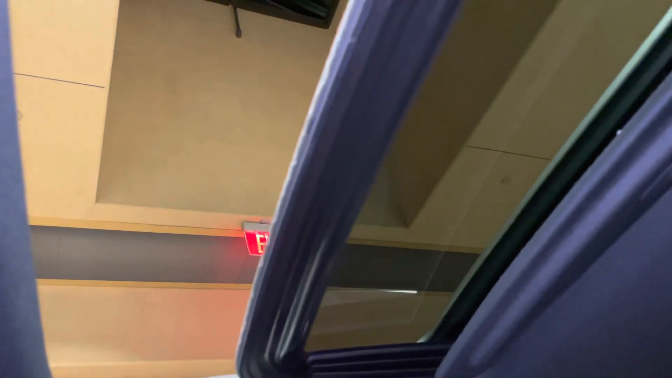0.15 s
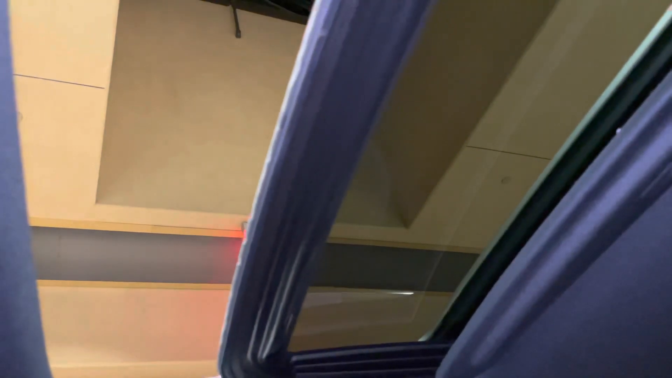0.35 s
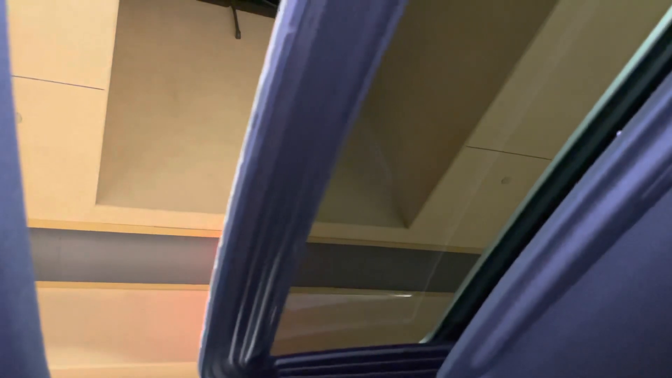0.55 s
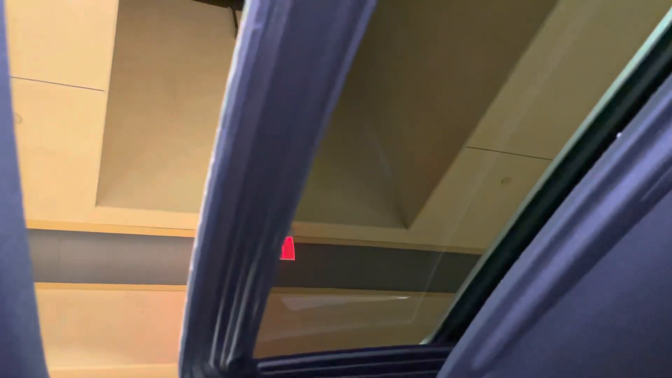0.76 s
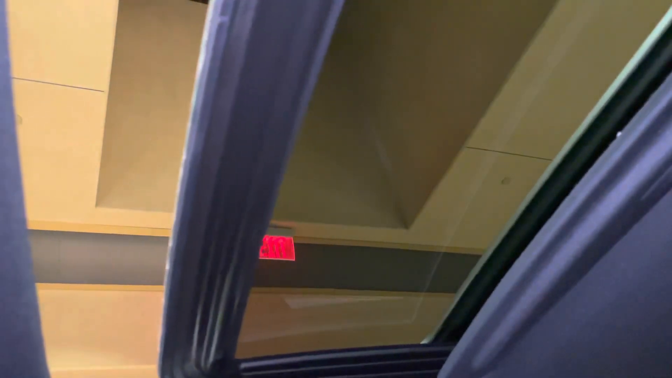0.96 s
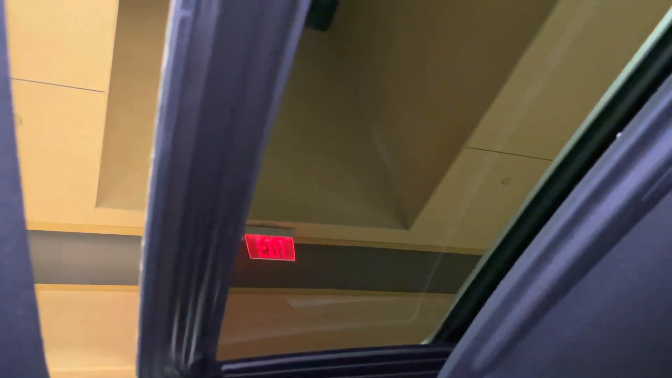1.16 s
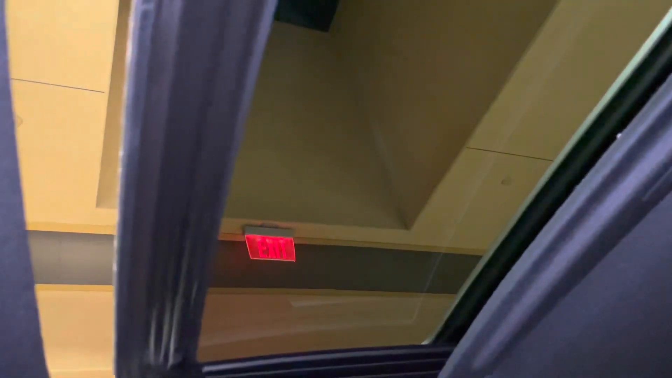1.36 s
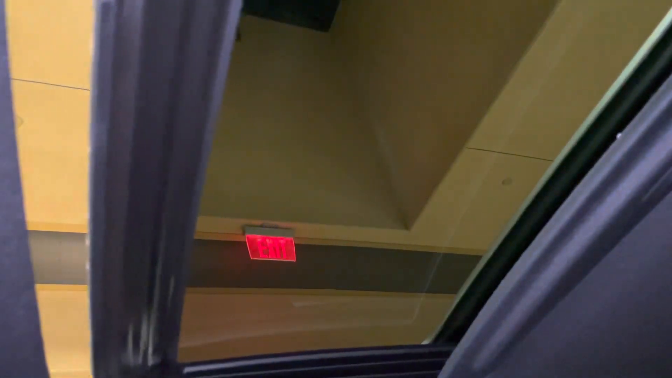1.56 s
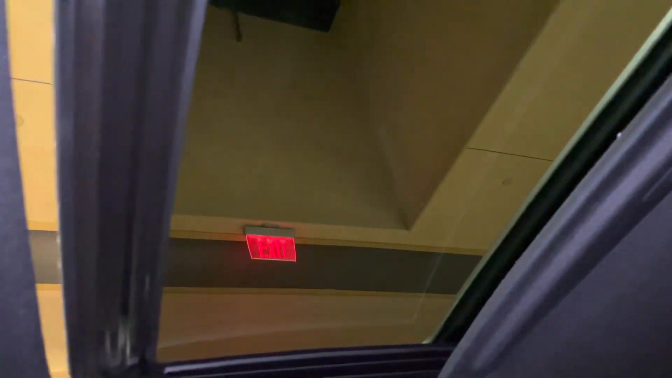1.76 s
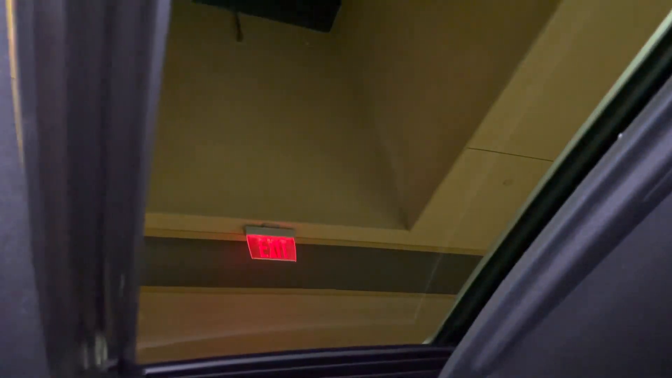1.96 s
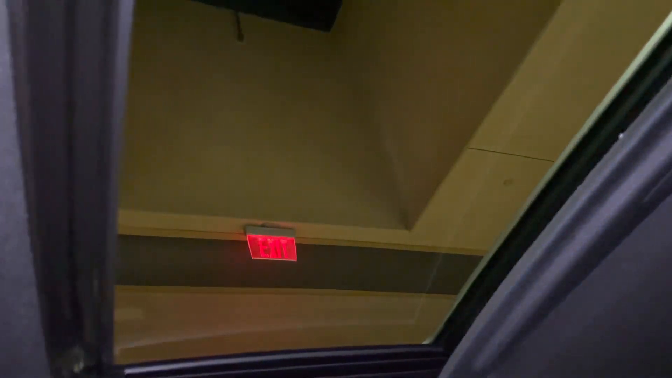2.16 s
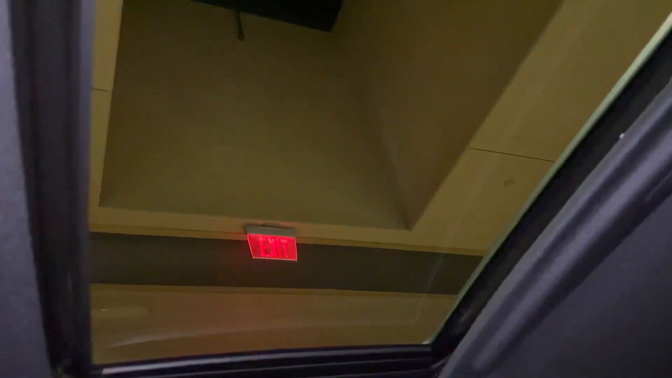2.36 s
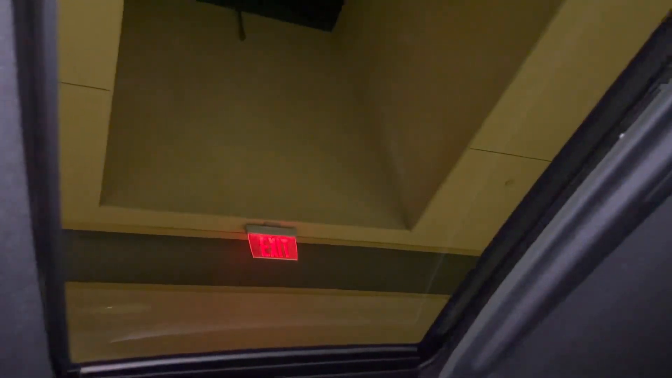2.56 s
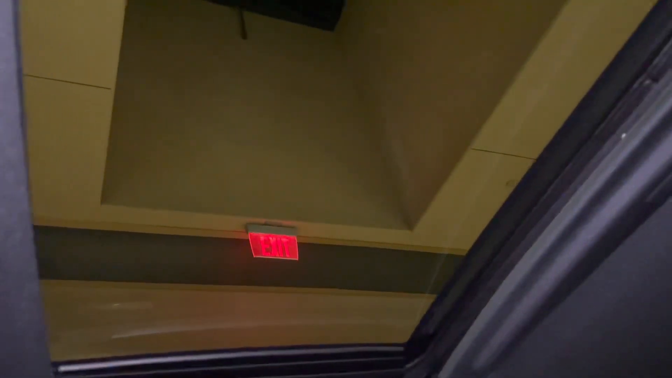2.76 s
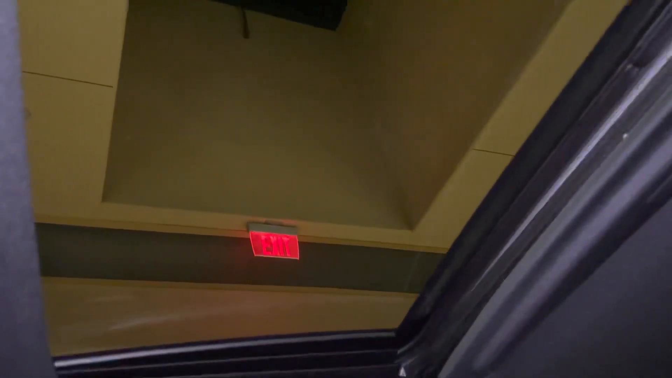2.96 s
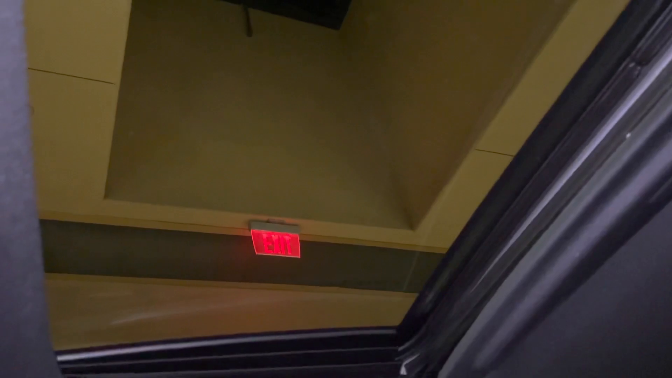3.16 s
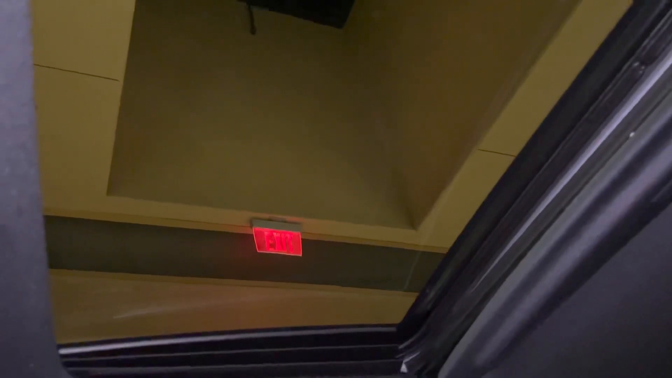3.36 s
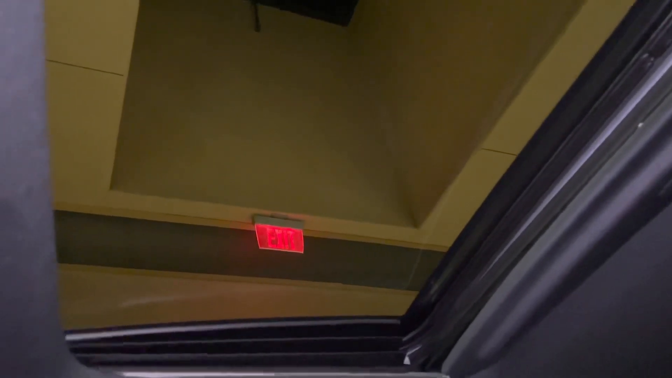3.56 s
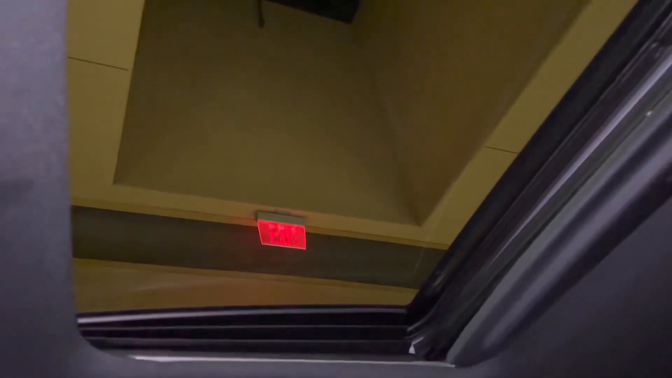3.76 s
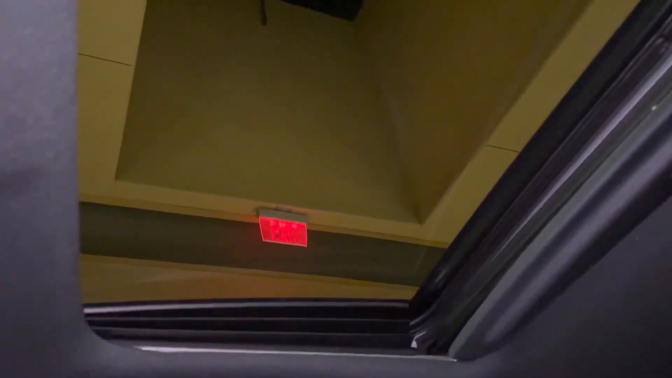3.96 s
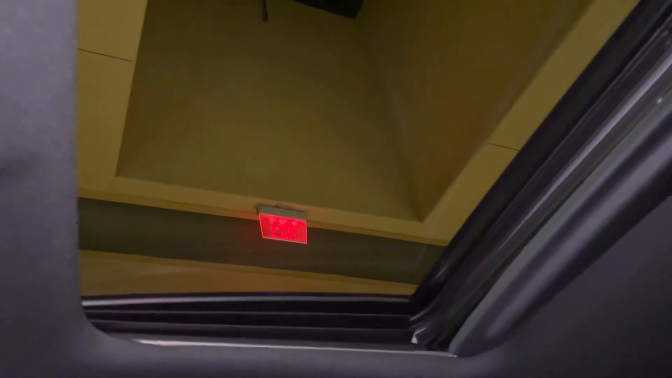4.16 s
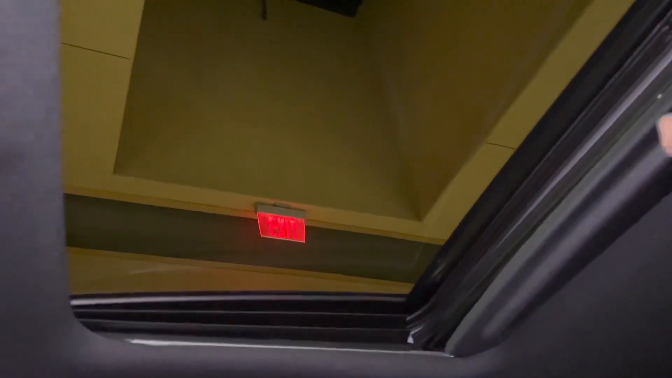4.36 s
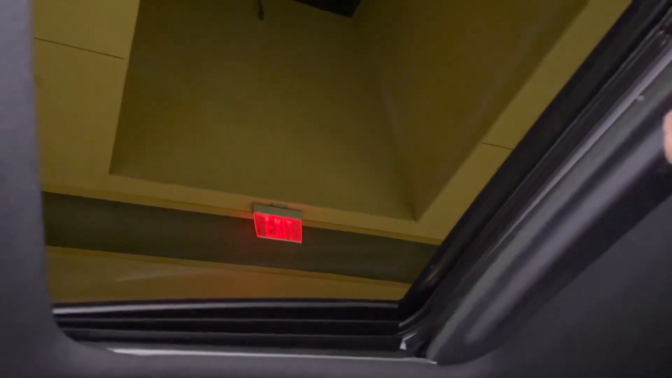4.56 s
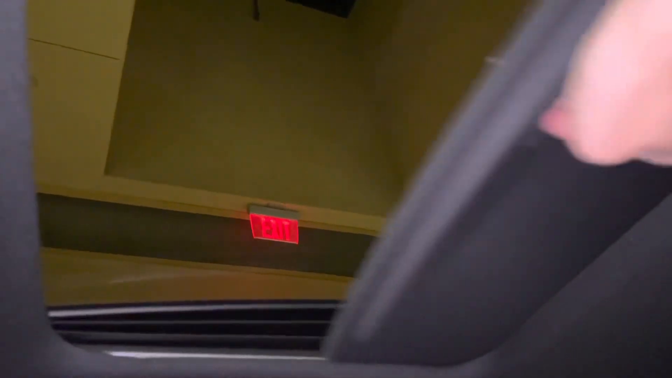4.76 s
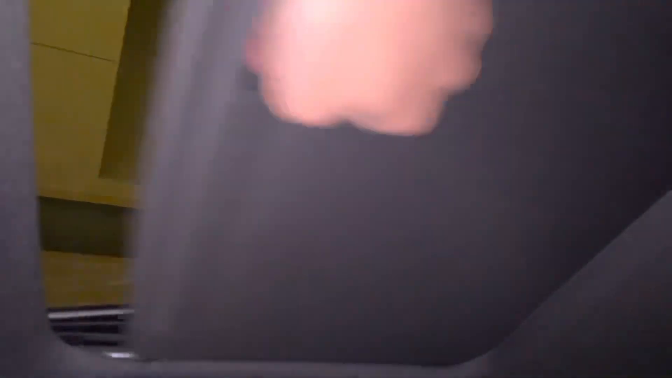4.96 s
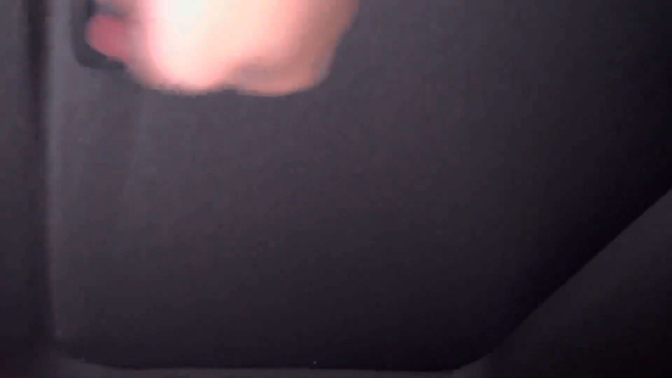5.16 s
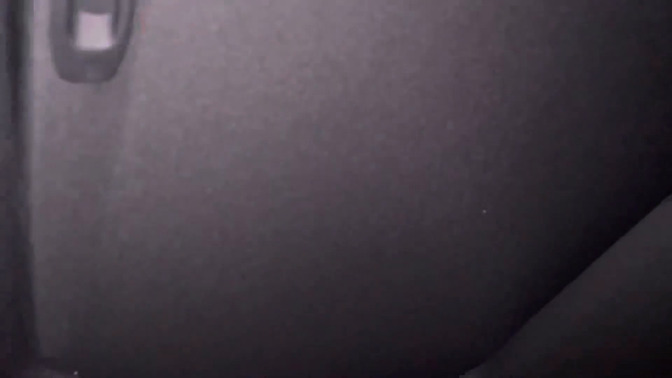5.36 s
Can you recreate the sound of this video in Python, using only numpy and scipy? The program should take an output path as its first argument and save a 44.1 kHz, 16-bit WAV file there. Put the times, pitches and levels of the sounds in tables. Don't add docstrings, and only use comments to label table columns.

```python
import sys
import numpy as np
from scipy import signal
from scipy.fft import rfft, irfft, next_fast_len
from scipy.io import wavfile
from scipy.ndimage import uniform_filter1d, map_coordinates

SR = 44100
rng = np.random.default_rng(int(sys.argv[2]) if len(sys.argv) > 2 else 0)


def file_out(sig):
    cols = np.atleast_2d(sig).T
    lim = np.clip(cols, -1, 1)
    pcm = np.round(lim * 32767).astype(np.int16)
    wavfile.write(sys.argv[1], SR, pcm)


def to_linear_factor(level_db):
    exponent = np.asarray(level_db, float) / 20
    return 10 ** exponent


N = 238565

# time in seconds, commutator tone in Hz, whine level in dB.
MOTOR = [(0, 662, -58), (.4, 664, -63.5), (.7, 669, -55), (1.55, 673, -48), (1.61, 659, -50), (2, 668, -49),
         (2.6, 661, -55.5), (2.72, 649.5, -64), (2.86, 605, -52), (2.96, 650, -56), (3.03, 692, -45.5),
         (3.1, 712, -61), (3.165, 722, -53)]
# frequency in Hz, likeness of the sides 0-1, lead of the right side in radians.
PORTS = [(30, .96, -.12), (70, .93, -.25), (130, .95, -.37), (300, .7, -1), (650, .75, -2.2),
         (1100, .45, -3.3), (2500, .3, -5.5), (7000, .25, -10.8), (8000, .5, -10), (9200, .99, -3 * np.pi),
         (9800, .68, -8.8), (12300, .8, -6.8), (13000, .999, -2 * np.pi)]
SEAT_S, STOP_S = 2.834, 3.178
FREE_HZ, BARS = 672, 8
RUNDOWN_DB_PER_S = 697


def unit(x):
    return x / np.sqrt(np.mean(x ** 2) + 1e-20)


def along(points, hz, axis=1):
    p = np.array(points)
    return np.interp(np.log(hz + 1), np.log(p[:, 0] + 1), p[:, axis])


def curves(rows, edge=None):
    s, *cols = np.transpose(rows)
    return [np.interp(np.arange(N) / SR, s, c, edge, edge) for c in cols]


def wobble(rate):
    step = np.arange(0, N + 64, 64)
    knots = rng.standard_normal(int(N * rate / SR) + 5)
    return np.interp(np.arange(N), step, map_coordinates(knots, [step * rate / SR]))


def after(s):
    return np.maximum(np.arange(N) / SR - s, 0)


def gap():
    return np.clip(1 - after(0) / SEAT_S, 0, 1)


def filtered(x, response):
    m = next_fast_len(x.shape[-1] + 4096)
    spectrum = rfft(x, m) * response(np.fft.rfftfreq(m, 1 / SR))
    return irfft(spectrum, m)[..., :x.shape[-1]]


def colour(points):
    low, high = (points[0][0] / 2, -80), (points[-1][0] * 2.3, -80)
    return lambda hz: to_linear_factor(along([low] + list(points) + [high], hz))


def resonances(modes):
    return lambda f: sum((-1) ** k * to_linear_factor(db) * 1j * f * w / (c * c - f * f + 1j * f * w)
                         for k, (c, w, db) in enumerate(modes))


def rush(response, patchy_db):
    z = signal.stft(rng.standard_normal((2, N)), nperseg=512)[2]
    field = uniform_filter1d(rng.standard_normal(z.shape[1:]), size=5, axis=0)
    field = uniform_filter1d(field, size=8, axis=1)
    noise = signal.istft(z * to_linear_factor(patchy_db * unit(field)), nperseg=512)[1][:, :N]
    return unit(filtered(noise, response))


def engine():
    # multiple of the firing rate, level in dB.
    firing = [(1, 0.5), (1.5, -32), (2, 3), (2.5, -47), (3, -8), (3.5, -23), (4, -15), (4.5, -11.5),
              (5, -20.5), (5.5, -23), (6, -19.5), (7, -20.5), (8, -26.5), (10, -24.5), (10.5, -21.5),
              (12, -31.5)]
    # frequency in Hz, level in dB per Hz.
    drone_colour = [(25, -8.5), (52, -7), (75, -11.5), (150, -16.5), (200, -22), (250, -18.5), (310, -32),
                    (358, -14.5), (392, -29), (420, -22.5), (455, -31.5), (510, -27), (600, -35.5),
                    (1500, -55)]
    # start in seconds, level in dB, t60 in seconds.
    shakes = [
        (2.78, -38, 0.94),
        (5.07, -28, 0.38),
    ]
    idle_hz, idle_db = 34.76, -44
    load_hz, settle_s = 0.3, 0.884
    third_db, load_third_db = -2.5, 7
    open_db, open_drone_db, drone_db = 2.44, 3.5, -51.5
    breath_db, drift_rad, skew_rad = 0.7, 0.05, 0.25

    load = np.clip(1 - after(STOP_S) / settle_s, 0, 1)
    turn = 2 * np.pi * np.cumsum(idle_hz + load_hz * load) / SR
    beat = 0
    for k, level in firing:
        third = (k == 3) * (third_db + load_third_db * load)
        level_db = level + third + breath_db * np.sqrt(k) * wobble(4.5)
        phase = k * turn + drift_rad * k * wobble(4.5) - skew_rad * k * k
        beat = beat + to_linear_factor(level_db) * np.cos(phase)
    drone = to_linear_factor(drone_db + open_drone_db * gap() + 0.5 * wobble(2.5))
    for s, db, t60 in shakes:
        drone = drone + to_linear_factor(db - 60 * after(s) / t60) * (1 - np.exp(-after(s) / 0.032))
    rumble = to_linear_factor(5.5) * drone * rush(colour(drone_colour), patchy_db=1)
    return to_linear_factor(idle_db + open_db * gap()) * beat + rumble


def boom():
    # start in seconds, length in seconds, peak place 0-1, level in dB, frequency in Hz.
    swells = [
        (2.804, 0.14, 0.55, -30.5, 49.7),
        (2.933, 0.2, 0.35, -25.5, 49),
        (3.139, .19, .3, -38, 54.2),
        (5.059, 0.15, 0.59, -20.5, 51.35),
        (5.203, 0.029, 0.26, -31, 52),
        (5.241, 0.13, .35, -33, 57.4),
    ]
    out = np.zeros(N)
    for s, length, top, db, hz in swells:
        u = np.clip(after(s) / length, 0, 1) ** (np.log(0.5) / np.log(top))
        swell = np.abs(np.sin(np.pi * u)) ** 1.23
        out += to_linear_factor(db + 3.5) * swell * np.sin(2 * np.pi * hz * after(s))
    return out


def glide():
    # frequency in Hz, level in dB per Hz.
    grind_colour = [(230, -10), (400, -3.5), (700, -0.5), (1100, -6), (1180, -6.5), (1350, -8.5),
                    (1650, -11.5), (2050, -11), (2400, -15.5), (2650, -17.5), (3000, -22), (3350, -20),
                    (4300, -27), (5000, -28.5)]
    # frequency in Hz, level in dB per Hz.
    hiss_colour = [(1000, -5), (2500, -3.5), (5000, -0.5), (7000, -4.5), (9000, -6), (12000, -3),
                   (14000, -8.5), (15700, -19.5)]
    grind_floor_db, strain_db_per_hz = -52.5, 0.0639
    slide_db, nearing_db = -66.5, 3
    lift_db_per_s, lift_db = 46, 10.5

    hz = curves(MOTOR)[0]
    off_db = -RUNDOWN_DB_PER_S * after(STOP_S - 0.012)
    grind_db = grind_floor_db + strain_db_per_hz * np.abs(FREE_HZ - hz) + off_db
    lifting_db = np.minimum(lift_db_per_s * after(SEAT_S - 0.04), lift_db)
    hiss_db = slide_db + nearing_db * (1 - gap()) - lifting_db + 0.29 * off_db
    shaft = np.sin(2 * np.pi * np.cumsum(hz) / SR / BARS)
    grind = to_linear_factor(grind_db + 0.31 * shaft + 0.8 * wobble(12)) * rush(colour(grind_colour), patchy_db=1.42)
    hiss = to_linear_factor(hiss_db + 5 + 0.28 * shaft + 0.27 * wobble(20)) * rush(colour(hiss_colour), patchy_db=1.45)
    return grind + hiss


def whine():
    # multiple of the shaft rate, level in dB.
    gears = [(9, -71), (10, -71), (11, -70), (12, -72), (13, -74), (16, -64), (24, -75), (32, -77),
             (40, -74)]
    far_rad, near_rad, nearing_s = 3.66, 1.82, 0.21
    waver, flutter_db = 0.002, 1.8

    def sides(rad):
        return np.reshape([rad / 2, -rad / 2], (2, -1))

    hz, db = curves(MOTOR)
    lead = near_rad + (far_rad - near_rad) * np.exp(-after(0) / nearing_s)
    turn = 2 * np.pi * np.cumsum(hz * (1 + waver * wobble(30.38))) / SR
    tone = to_linear_factor(db + flutter_db * wobble(21.9)) * np.sin(turn + sides(lead))
    for k, level in gears:
        order = k / BARS
        phase = order * turn + sides(-along(PORTS, order * FREE_HZ, axis=2))
        tone = tone + to_linear_factor(level + 2 * flutter_db * wobble(7.07)) * np.sin(phase)
    return to_linear_factor(4.5 - 2 * RUNDOWN_DB_PER_S * after(STOP_S)) * tone


def rub():
    # time in seconds, effort in dB.
    sleeve_rows = [(3.25, -100), (3.42, -74), (3.52, -81.5), (4.01, -72.5), (4.31, -65.5), (4.6, -71.5),
                   (5.15, -82), (5.22, -70.5), (5.41, -70)]
    # time in seconds, effort in dB.
    shade_rows = [(4.38, -86), (4.57, -66.5), (4.73, -58), (4.91, -55), (5.017, -57), (5.065, -39),
                  (5.082, -62.5), (5.115, -78), (5.15, -90)]
    # time in seconds, effort in dB.
    rebound_rows = [(5.15, -82), (5.164, -62.5), (5.178, -55), (5.196, -71), (5.23, -74)]
    # frequency in Hz, level in dB per Hz.
    scrape_colour = [(400, 2), (1000, 22), (1400, 12.5), (2400, -13.5), (4000, -40)]
    # frequency in Hz, level in dB per Hz.
    fabric_colour = [(1500, -6), (3000, -8), (5000, -4.5), (7500, -9.5), (10000, -8), (13000, -10),
                     (14500, -17), (15700, -27)]
    # frequency in Hz, width in Hz.
    rails = [(1950, 180), (2900, 370)]
    # time in seconds, level in dB.
    squeak_rows = [
        [(4.6, -54), (4.672, -52.5), (4.786, -51), (4.892, -72), (5.008, -60)],
        [(4.892, -50.5), (4.998, -60)],
    ]
    sing_db = (-7.5, -33)
    build_db_per_s, fade_db_per_s = 350, 334
    sleeve_top_hz = 12300

    sleeve, shade, rebound = (curves(rows, edge=-130)[0] for rows in (sleeve_rows, shade_rows, rebound_rows))
    push = np.maximum(shade, rebound)
    scrape = 0
    for effort, db, growth in ((sleeve, -77.5, 0.48), (push, -74, 0.87)):
        scrape = scrape + to_linear_factor(db + growth * (effort + 75.5)) * (effort > -120)
    drag, t = wobble(35), after(0)
    out = scrape * to_linear_factor(0.5 + drag) * rush(colour(scrape_colour), patchy_db=1.5)
    for squeaks, steady_db, (hz, width) in zip(squeak_rows, sing_db, rails):
        song = to_linear_factor(shade + steady_db)
        for s, db in squeaks:
            song = song + to_linear_factor(db - np.maximum(build_db_per_s * (s - t), fade_db_per_s * (t - s)))
        out = out + song * to_linear_factor(drag - 1) * rush(resonances([(hz, width, 0)]), patchy_db=1)
    cloth = filtered(rush(colour(fabric_colour), patchy_db=3), lambda hz: 1 / (1 + (hz / sleeve_top_hz) ** 2))
    out = out + to_linear_factor(sleeve + 4.5 + 0.5 * drag) * cloth
    return out + to_linear_factor(push + 3.5 + drag) * rush(colour(fabric_colour), patchy_db=1)


def taps():
    # start in seconds, crack in dB, knock in dB, t60 in seconds, ring in Hz.
    dull = [(1.54, -53.5, -39, 0.21, 2110), (2.817, -37.5, -16, 0.09, 1870), (2.8349, -42, -27, 0.13, 1510),
            (2.937, -51, -34.5, 0.063, 2300), (3.172, -47.5, -29, 0.049, 1690),
            (3.3645, -64, -52, .06, 1450), (3.387, -61.5, -70, 0.074, 2150),
            (3.4048, -27.5, -22, 0.064, 1580), (3.4743, -66, -47, 0.12, 2850),
            (4.2948, -58, -67, .066, 1501), (4.329, -59.5, -58, 0.16, 1560),
            (4.4007, -54.5, -41, 0.048, 1890), (5.0634, -27, -18.5, 0.072, 2300),
            (5.088, -42, -18, 0.066, 1360), (5.1612, -45, -50, 0.021, 2900)]
    # start in seconds, crack in dB, knock in dB, t60 in seconds, ring in Hz.
    bright = [
        (2.5992, -57, -30.5, 0.071, 2000),
        (2.628, -72, -28.5, 0.098, 1300),
        (3.1669, -43.5, -24, 0.051, 4000),
        (3.184, -72, -34.5, 0.071, 1470),
        (4.4513, -46.5, -61, 0.045, 2280),
        (4.5433, -43, -62, .048, 1290),
        (4.593, -61, -49, 0.27, 1760),
        (4.958, -50, -32.5, 0.23, 1000),
        (5.401, -59, -53, 0.055, 1420),
    ]
    # start in seconds, crack in dB.
    tick_rows = [
        (3.1675, -57),
        (3.880, -68),
        (3.889, -63),
        (4.786, -55),
        (5.090, -63),
        (5.1227, -50),
        (5.198, -70),
        (5.303, -63.5),
    ]
    # frequency in Hz, width in Hz, level in dB.
    trim = [(255, 25, -0.5), (314, 58, -2), (338, 29, 0), (436, 39, -4), (620, 85, -6.5), (813, 173, -12),
            (1057, 217, -15.5)]
    # frequency in Hz, width in Hz, level in dB.
    clips = [(950, 130, 7), (1530, 940, 0.5), (2570, 1150, -7), (3960, 210, -27), (4300, 2300, -13)]
    # frequency in Hz, width in Hz, level in dB.
    fizz_modes = [(5800, 1500, 0.5), (12440, 3200, -2.5)]
    ticks = [(s, db, db + 4, 0.018, 3800) for s, db in tick_rows]

    def fizz(f):
        return resonances(fizz_modes)(f) ** 2

    out, t = np.zeros((2, N + SR)), np.arange(SR // 4) / SR
    for rows, fizz_db in ((dull, -13), (bright, -5.5), (ticks, 15.5)):
        for s, crack_db, knock_db, t60, ring_hz in rows:
            crack = resonances(clips + [(ring_hz, 0.061 * ring_hz, 3)])
            bands = ((knock_db, resonances(trim), 1.6, 0.003),  # level, response, life in t60s, rise in s
                     (crack_db + 4, crack, 1.1, 0.001),
                     (crack_db + fizz_db, fizz, 0.8, 0.001))
            for db, response, life, rise in bands:
                burst = unit(filtered(rng.standard_normal((2, len(t))), response))
                envelope = to_linear_factor(db - 3 - 60 * t / (life * t60)) * (1 - np.exp(-t / rise))
                out[:, round(s * SR):][:, :len(t)] += envelope * burst
    return out[:, :N]


def thumps(blows, modes, scatter_db):
    out, t = np.zeros(N + SR), np.arange(SR // 2) / SR
    for s, db, attack in blows:
        ring = 0
        for hz, level, t60 in modes:
            level_db = level + scatter_db * rng.normal() - 60 * t / t60
            ring = ring + to_linear_factor(level_db) * np.sin(2 * np.pi * hz * t)
        out[round(s * SR):][:len(t)] -= to_linear_factor(db) * ring * (1 - np.exp(-(t / attack) ** 2))
    return out[:N]


def panel_seating():
    # start in seconds, level in dB, attack in seconds.
    blows = [
        (2.826, -22.5, 0.0046),
        (2.88, -38.5, 0.011),
        (3.19, -42.5, 0.0068),
        (3.41, -41, 0.0036),
    ]
    # frequency in Hz, level in dB, t60 in seconds.
    modes = [(128.6, -6.5, 0.56), (191, 1.5, 0.32), (258, -16, .2), (305.7, -7, 0.27), (370, -5, 0.14),
             (460, -5, 0.17), (592, -11, 0.17), (716, -10, 0.14), (1006, -1, 0.051)]
    return thumps(blows, modes, scatter_db=3)


def sunshade_slam():
    # start in seconds, level in dB, attack in seconds.
    blows = [
        (5.069, -20, 0.0024),
        (5.0778, -12, 0.0011),
        (5.134, -25.5, 0.0065),
    ]
    # frequency in Hz, level in dB, t60 in seconds.
    modes = [(83.6, -4.5, 0.21), (99.2, -6.5, 0.26), (127.2, 0.5, 0.22), (151, -5.5, 0.13),
             (184, -4.5, 0.2), (245.5, -2.5, 0.18), (273, -5, 0.19), (302, -8, 0.29), (347.2, -7.5, 0.22),
             (365, -44, 0.15), (437, -16, 0.19), (496, -29, .15)]
    return thumps(blows, modes, scatter_db=1.5)


def scene():
    knocks = panel_seating() + sunshade_slam() + boom()
    knocks = np.array([knocks, np.roll(knocks, 45)])
    first, second = engine() + glide() + rub() + taps() + knocks

    def alike(hz):
        return along(PORTS, hz)

    shared = filtered(first, lambda hz: alike(hz) * np.exp(1j * along(PORTS, hz, axis=2)))
    right = shared + filtered(second, lambda hz: np.sqrt(1 - alike(hz) ** 2))
    return np.array([first, to_linear_factor(-1.3) * right]) + whine()


def band_limit(x):
    return signal.sosfilt(signal.butter(12, 15750, fs=SR, output="sos"), x)


def record(dry):
    # frequency in Hz, level in dB.
    port_dip = [(5000, 0), (5600, -5.5), (6100, -0.5)]
    top, hiss_floor_db = 0.6, -84
    x = filtered(dry, lambda hz: to_linear_factor(along(port_dip, hz)))
    x = x / (1 + np.abs(x / top) ** 4) ** (1 / 4)
    x = x + to_linear_factor(hiss_floor_db) * rng.standard_normal(dry.shape)
    return band_limit(x)


dry = scene()
out = record(dry)
file_out(out)
```